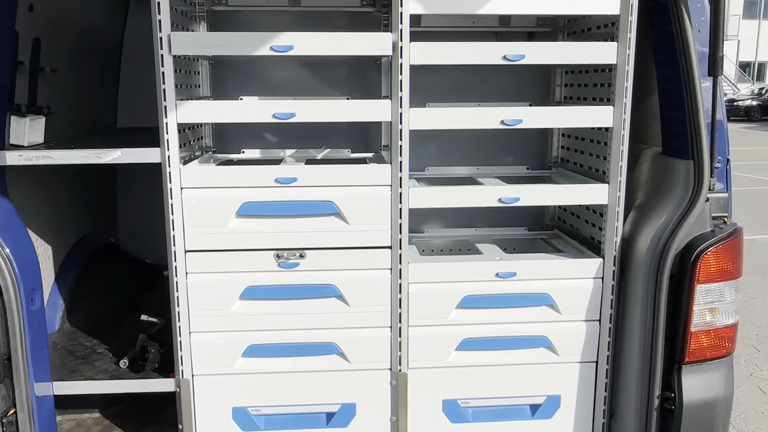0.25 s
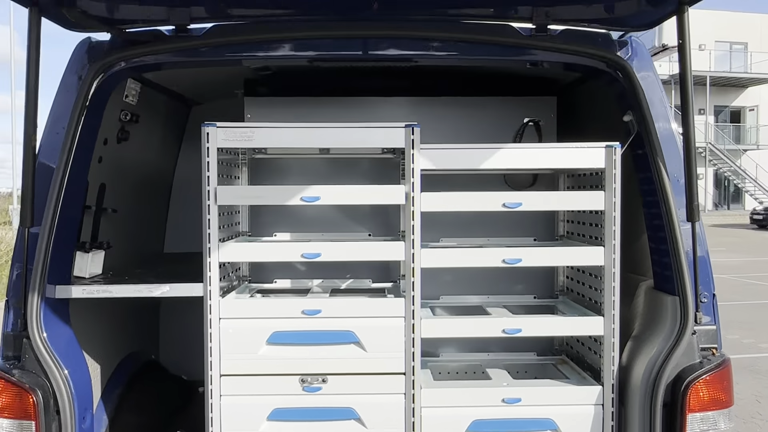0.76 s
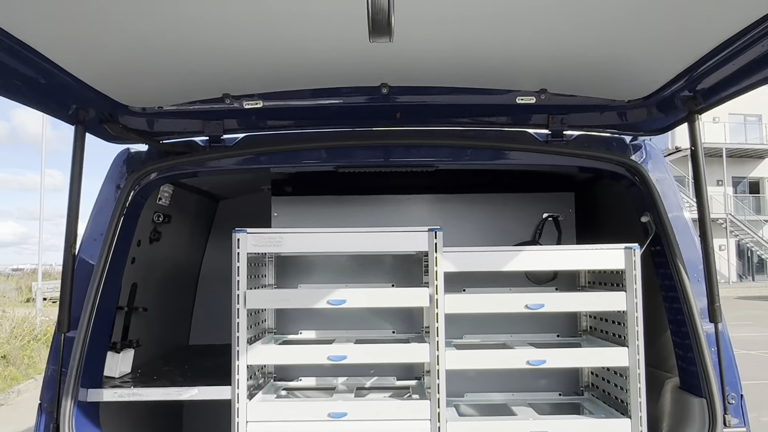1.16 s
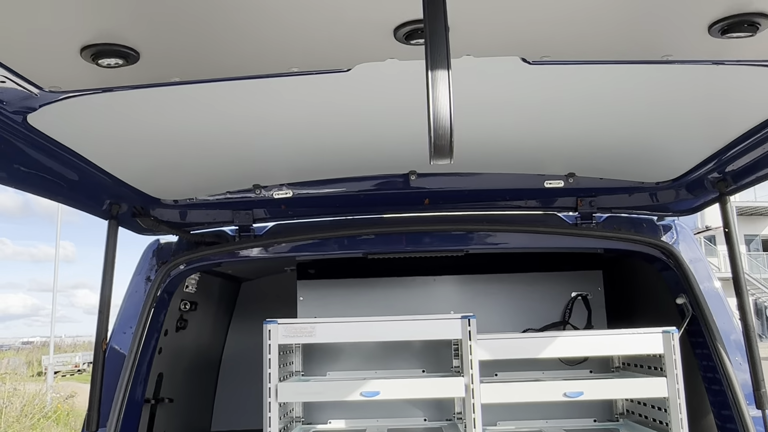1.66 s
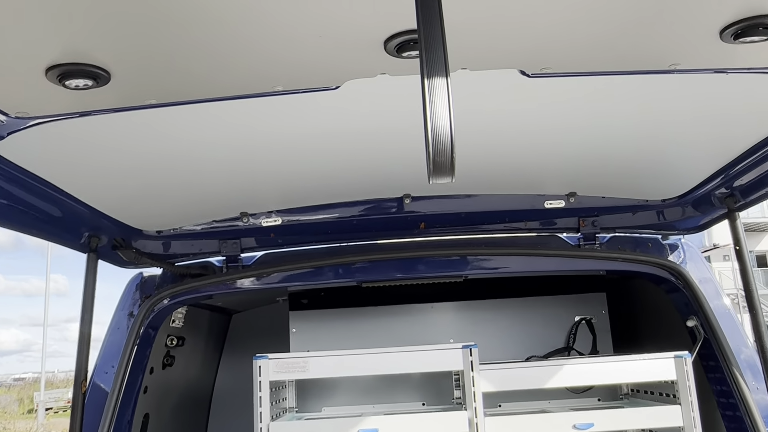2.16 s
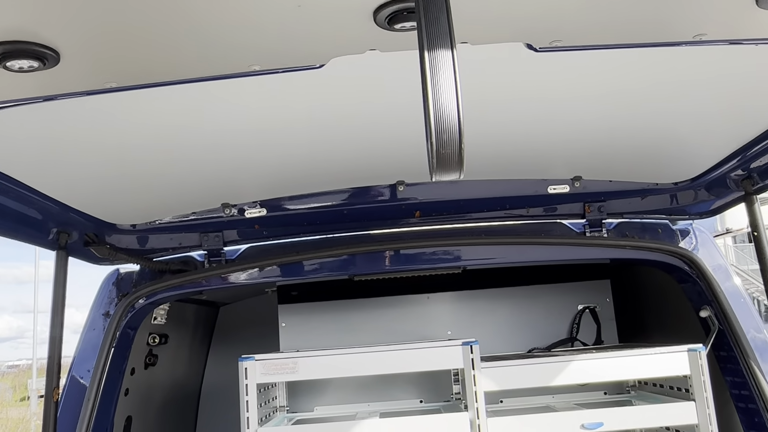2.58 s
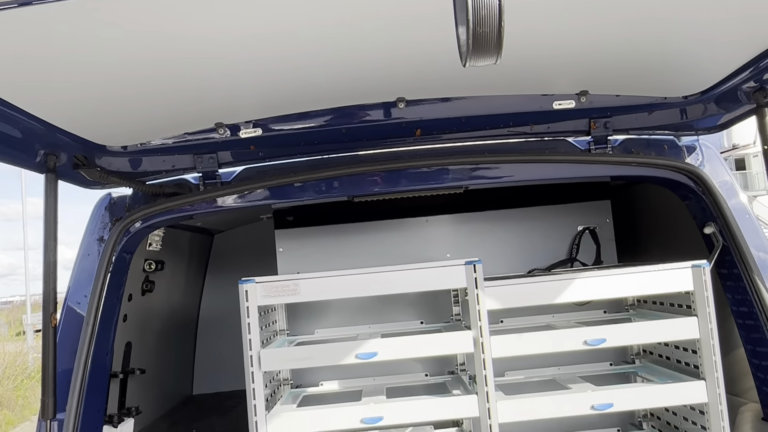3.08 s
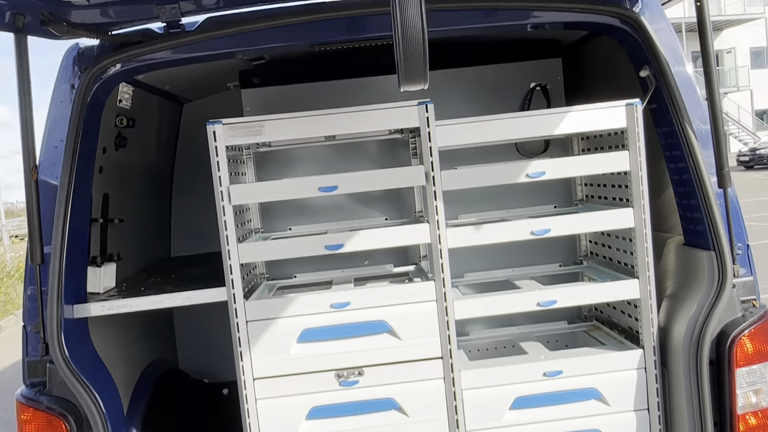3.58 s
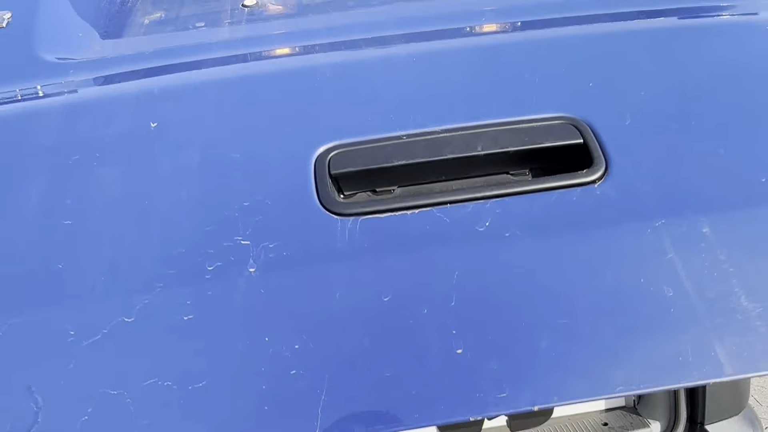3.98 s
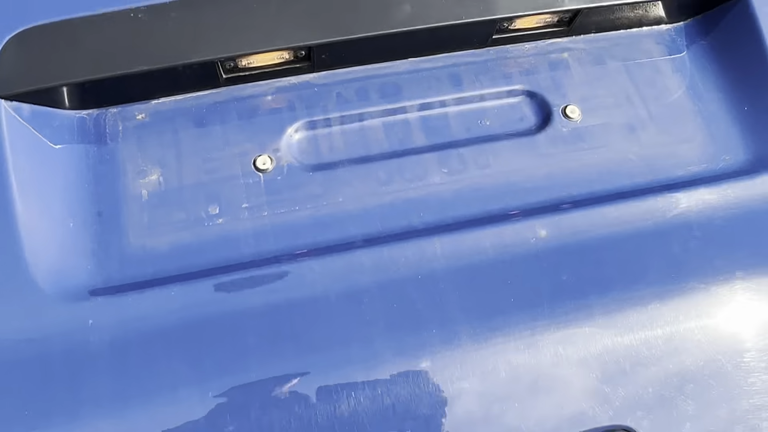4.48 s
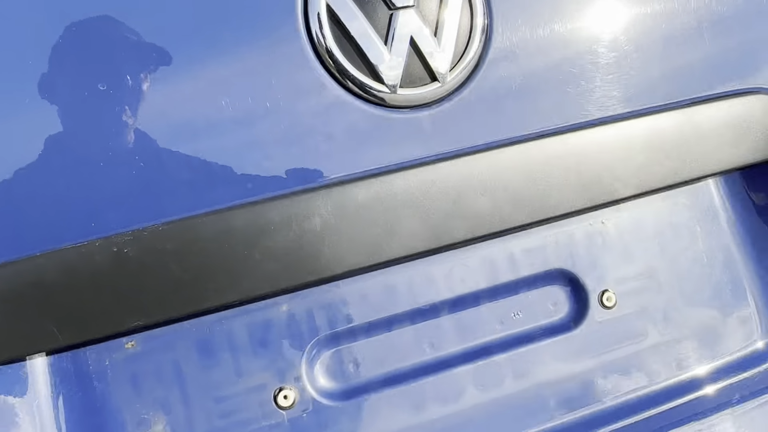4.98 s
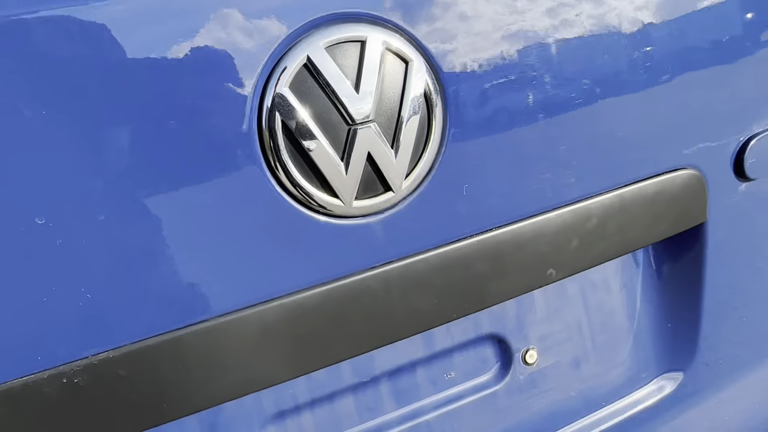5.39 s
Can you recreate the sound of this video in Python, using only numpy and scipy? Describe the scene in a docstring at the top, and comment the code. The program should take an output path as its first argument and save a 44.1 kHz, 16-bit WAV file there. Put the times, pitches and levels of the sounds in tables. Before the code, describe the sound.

A close hand-held camera microphone in an open yard catches a low idling van engine, far hiss and irregular low wind thuds. Small cloth rustles and ticks come and go. Midway, gas struts hiss quietly and rub; then strong gusts flutter, pop and crackle on the microphone. Finally a short rubber scrape leads into a hard, multi-contact tailgate slam with a low cabin thump and hardly any tail.

```python
"""A van engine throbs and drones while wind buffets and pops on a hand-held camera, over a far hiss.
Clothes and shoe soles rustle; then gas struts hiss, a tailgate's seal rubs and it slams with a boom.
The engine is a train of pulses ringing a pipe, plus a sine drone; wind is shaped noise plus falling sines.
The hiss, rustles, struts and seal are coloured noise whose levels follow tables over time.
The slam is a run of noise clatters and fading sines, for the metal panel and the air in the cabin."""
import sys
import numpy as np
from scipy import signal
from scipy.fft import rfft, irfft, next_fast_len
from scipy.io import wavfile
from scipy.ndimage import uniform_filter1d, map_coordinates

SR = 44100
rng = np.random.default_rng(int(sys.argv[2]) if len(sys.argv) > 2 else 0)


def materialize(psi):
    """Save the field psi as 16-bit PCM at rate SR to the path in sys.argv[1].

    A 1-D psi becomes a single channel; in a 2-D psi each row is a channel.
    """
    bounded = np.clip(np.atleast_2d(psi).T, -1, 1)
    quanta = np.round(bounded * 32767).astype(np.int16)
    wavfile.write(sys.argv[1], SR, quanta)


N = 248724  # length in samples
FIRING_HZ = 28.68  # engine firings per second

# How alike left and right are in the hisses: f/Hz, likeness (0 unrelated, 1 identical)
HISS_LIKENESS = [(300, 0.42), (550, 0.8), (1650, .3), (4000, 0.15), (8000, 0.27), (11000, .3), (13000, .8)]


def amp(db):
    """Turns decibels into a plain multiplier."""
    return 10 ** (np.asarray(db) / 20)


def unit(x):
    """Scales a sound to an rms (average strength) of 1."""
    return x / np.sqrt(np.mean(x ** 2) + 1e-20)


def along(points, hz):
    """Reads a curve of (f/Hz, value) points, with frequency on a log axis."""
    f, value = np.transpose(points)
    return np.interp(np.log(hz + 1), np.log(f + 1), value)


def curves(rows):
    """Gives one value per sample for each column after the time."""
    s, *columns = np.transpose(rows)
    return [np.interp(np.arange(N) / SR, s, column) for column in columns]


def wobble(rate):
    """Draws a smooth random curve through `rate` random points a second."""
    knots = rng.standard_normal(int(N * rate / SR) + 4)
    return map_coordinates(knots, [np.arange(N) * rate / SR])


def filtered(x, response):
    """Multiplies the spectrum of x by a response, which may be complex, at each frequency."""
    m = next_fast_len(x.shape[-1] + SR // 4)
    spectrum = rfft(x, m) * response(np.fft.rfftfreq(m, 1 / SR))
    return irfft(spectrum, m)[..., :x.shape[-1]]


def rush(spectrum, likeness, size=None, patchy_db=0):
    """Makes stereo noise of rms 1 with a given colour, left-right likeness and patches of random gain."""
    z = signal.stft(rng.standard_normal((2, size or N)), nperseg=512)[2]
    field = rng.standard_normal(z.shape[1:])
    field = uniform_filter1d(uniform_filter1d(field, 4, 0), 8, 1)
    patchy = z * amp(patchy_db * unit(field))
    pair = signal.istft(patchy, nperseg=512)[1][:, :size or N]

    def colour_and_share(hz):
        turn = np.arccos(along(likeness, hz)) / 2  # splits the power between middle and side
        return amp(along(spectrum, hz)) * [np.cos(turn), np.sin(turn)]

    mid, side = filtered(pair, colour_and_share)
    return unit(np.array([mid + side, mid - side]))


def evened(x, seconds):
    """Flattens the sound's own swells that are slower than the given time."""
    power = uniform_filter1d(np.mean(x ** 2, 0), int(seconds * SR))
    return unit(x / np.sqrt(np.abs(power) + .1))


def add(track, s, sound):
    """Mixes a short sound into a track at time s."""
    part = track[:, round(s * SR):][:, :sound.shape[-1]]
    part += sound[..., :part.shape[1]]


def engine():
    """Firings a little uneven in size and timing ring the exhaust pipe; a drone sounds at three times their rate."""
    # Exhaust pipe resonances: f/Hz, width/Hz, level/dB
    exhaust = [(55, 14, -11.5), (86.7, 12, 3.5), (138.2, 33, -6), (268.3, 75.3, -1.5), (340.7, 31, -18.5),
               (403, 190, -25), (548.6, 60, -22), (779, 27, -20)]
    # Loudness as the lowered tailgate screens the engine: t/s, throb level/dB, drone level/dB
    idle = [(0, -41.5, -35.5), (1.1, -44, -38), (2, -44, -37.5), (2.3, -44, -57), (3.2, -43.5, -50),
            (3.5, -41.5, -33.5), (3.7, -42.5, -47), (4.1, -52, -51.5), (5.64, -42, -52)]
    s = np.arange(0.010926, N / SR - .01, 1 / FIRING_HZ)  # firing times, s
    jitter, size = rng.standard_normal((len(s), 2)).T
    firing_samples = ((s + 0.00014 * jitter) * SR).astype(int)
    pulses = np.bincount(firing_samples, amp(2.1 * size), N)

    def pipe(f):
        # Squaring makes each resonance act twice: a soft start and dark valleys
        return sum(amp(db) * (1j * f * w / (c * c - f * f + 1j * f * w)) ** 2 for c, w, db in exhaust)

    throb_db, drone_db = curves(idle)
    throb = unit(filtered(pulses, pipe)) * amp(throb_db + 0.38 * wobble(5.6))
    drone_phase = 2 * np.pi * 3 * FIRING_HZ * np.arange(N) / SR + 1.5 * wobble(6.12)
    drone = np.sin(drone_phase) * amp(drone_db + 1.3 * wobble(2.8))
    both = throb + drone
    return np.array([both, np.roll(both, -2)])  # two samples sooner on the right


def wind():
    """Turbulence on the microphone ports: low buffets, lumpy flutter, and single eddies that pop or crack."""
    # Gusts: t/s, buffet level/dB, flutter level/dB
    gusts = [(0, -37.5, -52.5), (.24, -37.5, -56), (.35, -34, -49), (1.12, -41, -52.5), (1.22, -26, -60),
             (1.33, -31.5, -53), (1.55, -32, -45.5), (1.72, -31.5, -51), (1.8, -24.5, -40), (1.9, -33, -40),
             (2.0, -29, -51.5), (2.15, -40.5, -49.5), (2.56, -49, -46.5), (2.65, -30, -41),
             (2.85, -55.5, -52), (3.3, -45.5, -48), (3.55, -42.5, -43), (3.98, -38.5, -45),
             (4.04, -29, -48.5), (4.2, -22, -28.5), (4.31, -23.5, -31), (4.44, -15, -21.5),
             (4.53, -20.5, -34.5), (4.6, -31.5, -37.5), (4.7, -28, -37), (4.86, -35, -30),
             (4.95, -34.5, -36.5), (5.03, -37, -45), (5.12, -33.5, -44), (5.33, -38, -44),
             (5.42, -29.5, -36), (5.5, -39, -33.5)]
    # Colour of the low buffet: f/Hz, relative level per Hz/dB
    rumble = [(12, -45), (20, -48.5), (43, -5), (83, 0), (151, -25), (168, -36.5), (200, -33.5), (260, -56),
              (440, -120)]
    # Colour of the flutter: f/Hz, relative level per Hz/dB
    flutter_colour = [(65, -46), (110, 3), (221, -2), (287, -3.5), (369, -13), (503, -21.5), (728, -44),
                      (1200, -64), (1560, -89.5), (2640, -120)]
    # Eddies bursting on the ports: t/s, strength/dB, end pitch/Hz, time to fade by 60 dB/s, left over right/dB
    pops = [(.275, -19, 70, .1, 3), (0.656, -20, 68.4, 0.063, 5), (1.128, -21, 120, 0.1, 2),
            (1.194, -14.5, 97, 0.15, 0), (1.252, -14, 105.4, 0.13, 0), (1.29, -13, 70, 0.11, -3),
            (1.367, -19, 70, 0.11, 4), (1.445, -16.5, 69.3, 0.1, 4), (1.622, -18, 134, 0.099, -2),
            (1.686, -30, 156, 0.13, 0.0), (1.745, -8, 112.5, 0.055, -1), (1.786, -10.5, 100, 0.11, 2),
            (1.825, -15, 74.5, 0.062, 0), (1.882, -20, 130, 0.16, -5), (1.976, -16, 76.6, 0.18, -0.5),
            (2.085, -22, 73.5, 0.088, 0), (2.626, -12.5, 90, 0.079, 1), (2.67, -5.5, 62.3, 0.025, -2),
            (3.751, -17, 61.9, 0.08, 1), (4.041, -19, 108.5, 0.17, 5), (4.165, -12, 113, 0.097, -1.5),
            (4.255, -7, 157.7, 0.11, 7.5), (4.328, -12, 208.8, 0.17, -0.5), (4.365, -3.5, 189, 0.093, 2.5),
            (4.396, -5.5, 115, 0.077, -4), (4.411, -0.5, 96.4, 0.056, 12.5), (4.44, -7, 76, 0.11, -5),
            (4.495, -1, 109.4, 0.082, 4.5), (4.734, -14.5, 124.5, 0.1, -4), (4.885, -13.5, 241, 0.033, 6),
            (4.917, 1, 181, 0.014, 6), (4.955, -10.5, 91, 0.024, 0), (5.086, -16.5, 68.5, 0.066, 2),
            (5.119, -18.5, 268, 0.052, 2), (5.153, -23.5, 233, 0.063, -1), (5.204, -18, 67.5, 0.25, -1),
            (5.275, -2.5, 127, 0.027, 1.5), (5.405, -11.5, 70, 0.093, 0), (5.471, -25, 93, 0.07, -1)]
    # The sharpest eddies crack: t/s, strength/dB
    snaps = [(4.176, -38), (4.258, -32), (4.338, -32), (4.4, -23.5), (4.42, -17.5), (4.496, -29),
             (4.755, -36), (4.885, -33), (4.925, -31.5), (4.954, -26), (5.12, -39), (5.272, -32.5)]
    # Balance of buffet and flutter: t/s, left over right/dB
    side_wind = [(0, -2), (.75, -1.5), (2.39, -3.5), (2.73, -2.5), (3.08, -18.5), (3.3, -1), (4.27, 0),
                 (5.5, -1)]

    buffet_db, flutter_db = curves(gusts)
    lumps = wobble(21.88)
    buffet = evened(rush(rumble, [(40, 0.91), (120, 0.77)]), 0.063)
    buffet = unit(amp(2.2 * lumps) * buffet)
    flutter = evened(rush(flutter_colour, [(130, 0.73), (700, 0.75)]), 0.019)
    flutter = unit(amp(0.63 * lumps + 2.54 * wobble(55)) * flutter)

    eddies, stir = np.zeros((2, N)), np.zeros((1, N))
    t = np.arange(SR // 5) / SR
    for s, db, hz, t60, pan_db in pops:
        cycles = hz * (t + 0.00807 * (1 - np.exp(-t / 0.0039)))  # the pitch falls as the eddy spreads
        lead = rng.normal(-0.016, 0.025)  # cycles; half the shift between the two ports
        burst = amp(db - 60 * t / t60) * (1 - np.exp(-t / 0.0047)) ** 2
        pop = -np.sin(2 * np.pi * (cycles + [[lead], [-lead]])) * burst
        add(eddies, s, pop * amp([[pan_db / 2], [-pan_db / 2]]))
        # Each pop also stirs up flutter under its own envelope, more for high pops
        add(stir, s, amp(-14 + 8 * np.log2(hz / 120)) * burst)
    for s, db in snaps:
        envelope = np.exp(-t / 0.0026) * (1 - np.exp(-t / 0.0011))
        add(eddies, s, amp(db) * np.sin(2 * np.pi * 547 * t) * envelope)

    air = amp(buffet_db) * buffet + (amp(flutter_db) + stir) * flutter
    balance_db = curves(side_wind)[0]
    return air * amp(balance_db * [[.5], [-.5]]) + eddies


def yard():
    """A far hiss pulses faintly with the firings; its colour changes as the camera moves."""
    # Colour of distant traffic and engine hiss: f/Hz, relative level per Hz/dB
    hiss_colour = [(210, -22.5), (350, 1), (506, -14), (557, -0.5), (584, -3), (779, -26.5), (885, -4),
                   (1040, -12.5), (1680, -13), (1910, -13.5), (3670, -19), (6330, -15.5), (16000, -68)]
    # Hiss over time: t/s, level/dB, camera place (0 back, 1 under the tailgate)
    hiss_levels = [(0, -55.5, 0.64), (.5, -58, 0.43), (1.8, -59.5, 0), (2.2, -56, 1), (3.3, -57.5, 1),
                   (4, -56, 0.76), (5, -61, 0.78), (5.64, -57, 1)]
    # Bands lifted by the load bay, one list for each place: f/Hz, width/Hz, lift/dB
    ridges = [
        [(770, 40, 0), (989.4, 25, 20), (1905, 67, 13), (2530, 80, 8), (3200, 90, 7.5), (4210, 90, 8),
         (4710, 250, 5), (5800, 150, 0), (6330, 250, 4), (7260, 90, 10)],
        [(516, 17, 2.5), (1423, 120, 9.5), (2250, 110, 5), (2680, 270, 4), (4180, 80, 6.5), (4690, 250, 4.5),
         (6260, 150, 4)],
    ]
    level_db, place = curves(hiss_levels)
    beat = np.cos(2 * np.pi * FIRING_HZ * (np.arange(N) / SR - .022))
    hiss = rush(hiss_colour, HISS_LIKENESS, patchy_db=2.5)

    def lifted(bay):
        return filtered(hiss, lambda f: amp(sum(db * np.exp(-2 * ((f - c) / w) ** 2) for c, w, db in bay)))

    back, under = lifted(ridges[0]), lifted(ridges[1])
    level = amp(level_db + 1.3 * beat + 0.3 * wobble(20))
    return level * ((1 - place) * back + place * under)


def handling():
    """Clothes and soles make a grainy swish and a duller scrape that move together; a few ticks stand out."""
    # Constant stirring of clothes and soles: t/s, swish level/dB, scrape level/dB
    rustle = [(0, -63, -55.5), (1.6, -68.5, -56), (2.3, -66, -56.5), (2.68, -60.5, -55), (2.8, -69, -57),
              (3.3, -65, -57), (3.6, -57.5, -54.5), (3.94, -65.5, -59.5), (4.36, -63.5, -57.5),
              (4.6, -56.5, -51.5), (4.9, -63, -56), (5.44, -61.5, -57)]
    # Single brushes of cloth: start t/s, hold/s, swish level/dB, scrape level/dB
    brushes = [(0.052, 0.056, -56.5, -54), (1.955, 0.019, -60.5, -59), (2.987, 0.038, -63, -62),
               (3.334, 0.13, -58.5, -54), (3.996, .03, -62, -57), (4.402, 0.038, -58, -53),
               (4.71, 0.053, -55.5, -51.5), (5.067, .012, -53, -44)]
    # Colour of the swish: f/Hz, relative level per Hz/dB
    cloth = [(1180, -27), (2000, -2.5), (4260, 1.5), (6360, -1.5), (7570, 0), (8480, -3), (9660, -2),
             (10900, -28), (13000, -15.5), (15100, -9.5), (16000, -24)]
    # Colour of the scrape: f/Hz, relative level per Hz/dB
    scrape_colour = [(240, -29), (500, 2), (781, 0), (950, -5), (1130, -2.5), (1500, -8), (3000, -17),
                     (4500, -57), (6600, -120)]
    # Small hard contacts: t/s, strength/dB, time to fade by 60 dB/s, centre f/Hz
    ticks = [(0.1216, -36.5, 0.019, 1140), (2.261, -48, 0.028, 2500), (2.487, -41.5, .015, 800),
             (3.019, -51.5, 0.077, 3380), (3.022, -56, .04, 5600), (4.167, -40.5, 0.012, 1550),
             (5.0842, -36.5, 0.0067, 7800), (5.086, -46.5, .03, 3020), (5.47, -39.5, 0.057, 1510),
             (5.522, -42, 0.028, 1880)]

    levels, now = amp(curves(rustle)), np.arange(N) / SR
    rise_s, fall_db_per_s = 0.017, 246
    for s, hold, swish_db, scrape_db in brushes:
        rise = np.clip((now - s) / rise_s, 0, 1)
        fall = amp(-fall_db_per_s * np.maximum(now - s - rise_s - hold, 0))
        levels = np.hypot(levels, amp([[swish_db], [scrape_db]]) * rise * fall)

    grain = amp(0.79 * wobble(400))
    swish_likeness = [(3000, 0.17), (8000, 0.22), (11000, .35), (13000, 0.94)]
    swish = unit(grain * rush(cloth, swish_likeness, patchy_db=2.7))
    scrape = unit(grain * rush(scrape_colour, [(500, 0.67), (2000, 0.054)], patchy_db=2.0))
    out = levels[0] * swish + levels[1] * scrape

    t = np.arange(SR // 10) / SR
    for s, db, t60, hz in ticks:
        band = [(hz / 3, -40), (hz / 1.3, -5), (hz, 0), (hz * 1.2, -5), (hz * 1.6, -40)]
        envelope = amp(db - 60 * t / t60) * (1 - np.exp(-t / 0.0007))
        add(out, s, rush(band, [(1000, 0.66)], size=len(t)) * envelope)
    return out


def struts():
    """As the tailgate starts down, gas squeezed through the pistons hisses in narrow bands and the seals rub."""
    # Strut sounds over time: t/s, gas hiss level/dB, rub level/dB
    strut_levels = [(3.15, -83, -90), (3.27, -67, -82), (3.35, -62, -71), (3.42, -69, -50), (3.5, -75, -57),
                    (3.58, -65, -76), (3.72, -67, -83), (3.95, -72, -85), (4.1, -90.5, -86)]
    # Bands of the gas hiss: f/Hz, width/Hz, level/dB
    gas = [(3600, 250, 6), (8250, 410, -1), (14400, 300, -10.5)]
    # Bands of the strut seals dragging on their rods: f/Hz, width/Hz, level/dB
    rub_bands = [(790, 70, 2), (1110, 70, 4.5), (1310, 80, -6.5), (2050, 80, -16)]

    def banded(table):
        noise = rush([(500, 0.019), (16000, 0)], HISS_LIKENESS)  # almost flat
        bands = lambda f: sum(amp(db) / (1 + (2 * (f - c) / w) ** 2) for c, w, db in table)
        return unit(filtered(noise, bands))

    hiss, rub = banded(gas), banded(rub_bands)
    hiss_db, rub_db = curves(strut_levels)
    return amp(hiss_db + 1.6 * wobble(25)) * hiss + amp(rub_db + 2.2 * wobble(40)) * rub


def slam():
    """The seal wipes the frame, each metal contact clatters and rings the panel anew, and the cabin air booms."""
    # Rubber seal wiping the frame: t/s, level/dB
    seal = [(5.45, -87), (5.463, -62), (5.468, -46), (5.48, -37.5), (5.5, -40.5), (5.51, -42), (5.514, -49),
            (5.54, -51), (5.56, -87)]
    # Colour of the wipe: f/Hz, relative level per Hz/dB
    wipe_colour = [(410, -32), (700, -1), (1890, -6.5), (3240, -13.5), (5990, -10), (6320, -10),
                   (8990, -11), (10400, -9), (10900, -32.5), (13000, -11), (16000, -16.5)]
    # Latch and frame contacts: t/s, strength/dB, time for the clatter to fade by 60 dB/s,
    # clatter tilt/dB per octave, panel ring against the strength/dB, extra on modes under 450 Hz/dB
    blows = [(5.547, -8, 0.036, -4, -22, -3), (5.555, -15.5, 0.041, -5, -13, -1),
             (5.560, -20.5, 0.082, 3, -22.5, -10), (5.5668, -1, 0.031, 0.5, -14, -11.5),
             (5.5748, -11, 0.04, -4.5, -30, 0.5), (5.5795, -10, 0.042, -1.5, -22, -5.5),
             (5.5821, -8.5, 0.066, 0.5, -14.5, 6), (5.589, -11.5, 0.079, -16, -20.5, 0),
             (5.611, -20.5, 0.056, 0, -4, -14), (5.6166, -18.5, 0.1, -4, -11, 5)]
    # Colour of the clatter before its tilt: f/Hz, relative level per Hz/dB
    clatter_colour = [(350, -29.5), (600, -0.5), (906, -11.5), (1260, -11), (1490, -14.5), (2570, -12),
                      (2800, -9), (3040, -15), (7110, -22.5), (8270, -21), (9890, -19.5), (11200, -43.5),
                      (11800, -28), (14700, -30), (16000, -33)]
    # Tailgate modes, the pitches it rings at: f/Hz, level before random scatter/dB, time to fade by 60 dB/s
    panel = [(137.7, -8.5, 0.14), (210.5, 4, 0.97), (273.4, 2.5, 0.19), (389, 7, 0.056), (484, 3.5, 0.038),
             (610, 4.5, 0.032), (640, -8, .12), (670, -11.5, .08), (897, 0, 0.063), (1066, -4, 0.054),
             (1323, -15, 0.18), (1520, -6.5, 0.036), (2200, -23.5, 0.048), (2800, -19, 0.065),
             (3900, -16.5, 0.04), (3890, -30.5, 0.093), (5000, -6.5, .025), (6800, -23, 0.063),
             (8000, -21, .04), (10300, -25, .04)]
    # Cabin air squeezed as the seal closes: t/s, strength/dB, f/Hz, time to fade by 60 dB/s
    boom = [(5.592, -6.5, 45.5, 0.4), (5.593, -8.5, 82, 0.19)]

    out, t = np.zeros((2, N)), np.arange(SR // 8) / SR
    likeness = [(700, .8), (1500, 0.22), (3000, 0.17), (6000, 0.17), (8000, 0.51), (13000, 0.75)]
    for s, db, t60, tilt_db, panel_db, deep_db in blows:
        colour = [(hz, level + tilt_db * np.log2(hz / 2000)) for hz, level in clatter_colour]
        fade = amp(-6.5 - 60 * t / t60 + 2.2 * wobble(600)[:len(t)])
        fade = fade + amp(-21.5 - 60 * t / 0.17)  # the yard and the loose load rattle on
        clatter = rush(colour, likeness, size=len(t)) * fade
        scatter_db = rng.normal(0, 1.5, (len(panel), 2, 1))  # each mode, each side
        ring = 0
        for k, (hz, level, decay) in enumerate(panel):
            mode_db = level + deep_db * (hz < 450) + scatter_db[k] - 60 * t / decay
            ring = ring + (-1) ** k * amp(mode_db) * np.sin(2 * np.pi * hz * t)
        add(out, s, amp(db) * (clatter * (1 - np.exp(-t / 0.001)) + amp(panel_db) * ring))

    wipe = rush(wipe_colour, [(1000, 0.73), (3000, .2), (8000, .45), (13000, .9)])
    out += amp(curves(seal)[0] + 1.5 * wobble(380)) * wipe
    for s, db, hz, t60 in boom:
        envelope = amp(db - 60 * t / t60) * (1 - np.exp(-t / .002))
        add(out, s, envelope * np.sin(2 * np.pi * hz * t))
    return out


def scene():
    """Adds all the sources together."""
    return engine() + wind() + yard() + handling() + struts() + slam()


def record(dry):
    """Two ports on a small case; the camera cuts the deepest bass, rounds off peaks and limits the treble."""
    # The case delays treble to the left port: f/Hz, left lead/radians, left over right/dB
    ports = [(100, 0, 1.1), (1000, 0.98, 1), (2200, .5, -2.5), (3960, -2, -1), (5250, -5, 1), (8350, -6, 5),
             (10600, -9, -6.5), (12600, -10, 3), (15400, -15.5, -3)]
    f, lead, pan_db = np.transpose(ports)

    def half(hz):  # half of the difference between the ports
        return amp(np.interp(hz, f, pan_db) / 2) * np.exp(.5j * np.interp(hz, f, lead))

    def bass_cut_and_ports(hz):
        return (1j * hz / (1j * hz + 25)) ** 2 * [half(hz), 1 / half(hz)]

    x = np.pad(dry, ((0, 0), (0, 2048)), "linear_ramp")  # lets the end die away smoothly
    x = filtered(x, bass_cut_and_ports)
    x = x / (1 + np.abs(x / .95) ** 4) ** (1 / 4)  # peaks bend over towards 0.95
    return filtered(x, lambda hz: hz < 15800)[:, :N]


dry = scene()
out = record(dry)
materialize(out)
```